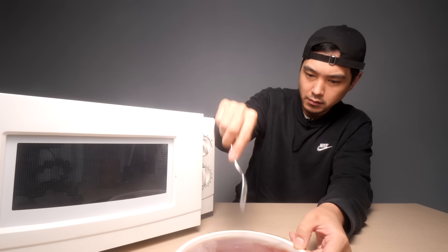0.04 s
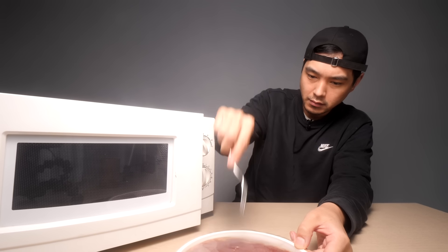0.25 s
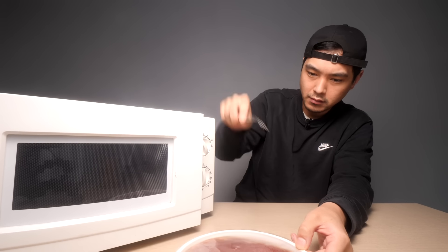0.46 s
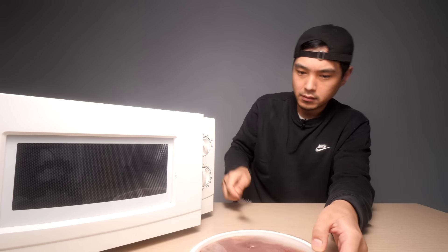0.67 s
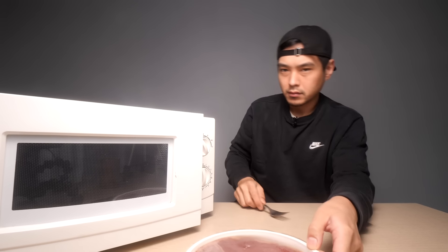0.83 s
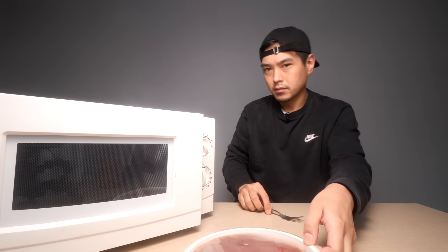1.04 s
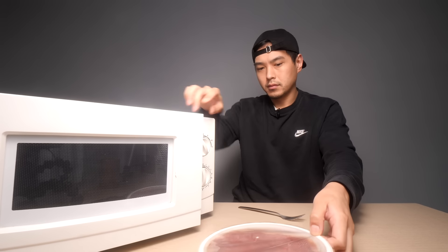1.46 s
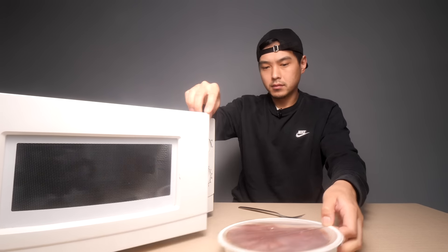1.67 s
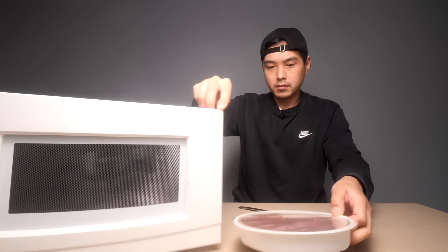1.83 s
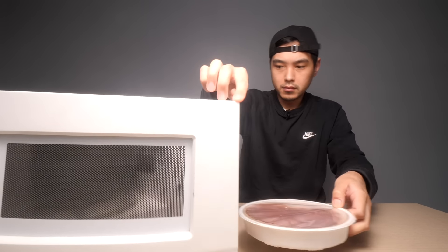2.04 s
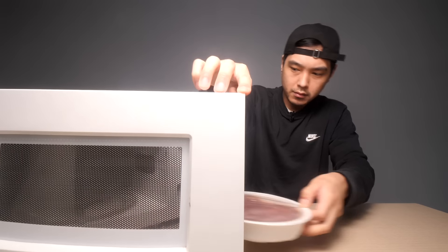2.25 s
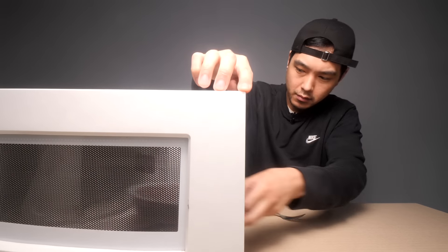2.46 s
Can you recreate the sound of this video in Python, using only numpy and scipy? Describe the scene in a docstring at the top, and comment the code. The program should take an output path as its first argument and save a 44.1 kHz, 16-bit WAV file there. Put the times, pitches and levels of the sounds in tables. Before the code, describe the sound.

A loud pop sounds as a fork pierces a food tray's taut plastic film. The fork then clatters onto a table, followed by faint sliding and a light knock on a microwave door, nearby in a small, faintly humming room.

```python
"""Soft knocks sound as a fork leaves a plastic food tray, over the fading wash of an earlier stab.
The fork stabs through the taut film lid: dull thumps, a loud pop and a long bright tail. Set down
tines first, it drops on the table, bounces and rings in its steel modes. The tray slides with soft
friction and an oven door is nudged, in a small quiet room with a faint mains buzz."""
import sys
import numpy as np
from scipy import signal
from scipy.fft import rfft, irfft
from scipy.io import wavfile

SR = 44100
rng = np.random.default_rng(int(sys.argv[2]) if len(sys.argv) > 2 else 0)


def wav_record(signal):
    """Record a signal, one row per channel, as 16-bit PCM in the file named by sys.argv[1]."""
    frames = np.transpose(np.atleast_2d(signal))
    bounded = np.clip(frames, -1, 1)
    # unit amplitude maps onto the largest positive 16-bit level
    quanta = np.round(bounded * 32767).astype(np.int16)
    wavfile.write(sys.argv[1], SR, quanta)


N = 114660
TIME = np.arange(N) / SR

# Bright spectrum of friction and light ticks. Each row: frequency in Hz, level in dB.
HISS_SPECTRUM = [(1500, -9), (4000, 1.5), (8000, 1), (12500, 0.5), (16000, 1)]


def from_db(db):
    """Amplitude grows tenfold for every 20 dB."""
    return 10 ** (np.asarray(db) / 20)


def rms_one(x):
    """Normalisation to unit mean power."""
    return x / np.sqrt(np.mean(x ** 2) + 1e-20)


def at_hz(points, hz, column=1):
    """Interpolation of a table column over log frequency."""
    points = np.array(points)
    return np.interp(np.log(hz + 1e-9), np.log(points[:, 0]), points[:, column])


def convolve(x, response):
    """A linear system convolves its input with its impulse response."""
    return signal.fftconvolve(x, response)[:N]


def colour(x, spectrum, size=4096):
    """Minimum-phase filtering: folding the cepstrum makes the response causal."""
    hz = np.arange(size // 2 + 1) * SR / size
    cepstrum = irfft(np.log(from_db(at_hz(spectrum, hz))))
    cepstrum[1:size // 2] *= 2
    cepstrum[size // 2 + 1:] = 0
    return convolve(x, irfft(np.exp(rfft(cepstrum))))


def noise(spectrum):
    """Filtering colours white noise; the result has unit power."""
    return rms_one(colour(rng.standard_normal(N), spectrum))


def decay(t60, start_s=0):
    """Exponential damping: from the start, 60 dB is lost every t60 seconds."""
    return np.exp(-np.log(1000) * np.maximum(TIME - start_s, 0) / t60)


def impulses(starts, db):
    """A brief contact is idealised as an impulse."""
    out = np.zeros(N)
    np.add.at(out, np.clip(np.asarray(starts) * SR, 0, N - 1).astype(int), from_db(db))
    return out


def blows(starts, db, spectrum, t60, scatter_db):
    """A damped body filters impacts. Returns direct sound with crackle, and bare pulses for the room."""
    mean_power = np.mean(from_db(at_hz(spectrum, np.linspace(0, SR / 2, N))) ** 2)
    pulses = np.sqrt(SR / 1000 / mean_power) * impulses(starts, db)  # dB is rms over a millisecond
    fade, scatter = decay(t60) ** 2, from_db(scatter_db)
    energy = np.abs(convolve(pulses ** 2, fade / fade.sum()))
    crackle = rng.standard_normal(N) * np.sqrt(energy)
    force = (pulses + scatter * crackle) / np.hypot(1, scatter)
    return np.array([colour(force, spectrum), colour(pulses, spectrum)])


def reverb(x, bands, first_echo_s=.0075):
    """A diffuse field acts as noise, each half-octave band decaying at its own rate."""
    edges = 44 * 2 ** (np.arange(18) / 2)
    white, response = rng.standard_normal((2, N)), 0
    for k, (low, high) in enumerate(zip(edges, edges[1:])):
        hz = np.sqrt(low * high)
        band = signal.sosfilt(signal.butter(2, [low, high], "band", fs=SR, output="sos"), white[k % 2])
        band = rms_one(band * decay(at_hz(bands, hz, column=2)) * (TIME > first_echo_s))
        response = response + band * from_db(at_hz(bands, hz)) * np.sqrt(2 * (high - low) / SR / N)
    return convolve(x, response)


def resonate(x, hz, t60):
    """A damped oscillator answers an impulse with a decaying sine."""
    r, w = np.exp(-np.log(1000) / (t60 * SR)), 2 * np.pi * hz / SR
    return signal.lfilter([0, np.sin(w)], [1, -2 * r * np.cos(w), r * r], x + 1e-18)


def room(x):
    """Reflections merge into a short diffuse tail, and one low room mode booms."""
    # Each row: frequency in Hz, level in dB, decay time in seconds.
    bands = [(60, -4, 0.397), (145.9, 3, 0.55), (500, -1, 0.36), (1214, 0.5, 0.62), (3000, -0.5, 0.49),
             (7040, -4, 0.4), (14000, -4, 0.36)]
    return reverb(x, bands) + from_db(-53) * resonate(x, hz=150.2, t60=.99)


def room_air():
    """The noise floor is steady and strongest in the bass."""
    # Each row: frequency in Hz, relative level in dB.
    spectrum = [(20, 1), (50, -2), (120, -8.5), (300, -16), (800, -20.5), (1800, -32), (5000, -36.5),
                (15000, -41.5)]
    return from_db(-56) * noise(spectrum)


def mains(hz=59.95, gap_s=.0081):
    """Periodicity gives harmonics: a low hum, and a buzz of one strong and one weak spike a cycle."""
    # Each row: multiple of the mains frequency, level in dB.
    harmonics = [(1, -57), (2, -56), (4, -62.5)]
    # Each row: frequency in Hz, relative level in dB.
    buzz_spectrum = [(60, -21), (230, -8.5), (320, -5.5), (500, 5.5), (750, -5), (950, -1.5), (1500, -12.5),
                     (3000, -18.5), (8000, -27.5), (15000, -36.5)]
    hum = sum(from_db(db) * np.sqrt(2) * np.sin(2 * np.pi * (round(k) * hz * TIME + rng.random()))
              for k, db in harmonics)
    cycles = np.arange(0, N / SR - gap_s, 1 / hz)
    spikes = impulses(cycles, db=0) - impulses(cycles + gap_s, db=-7)
    return hum + from_db(-62.5) * rms_one(colour(spikes, buzz_spectrum))


def light_knocks(events, body, t60, scatter_db, room_db):
    """Each light impact excites a damped body and adds a faint contact tick."""
    starts, knock_db, tick_db = np.transpose(events)
    knocks = blows(starts, knock_db, body, t60, scatter_db)
    direct, sent = knocks + blows(starts, tick_db, HISS_SPECTRUM, t60=.016, scatter_db=18)
    return direct + from_db(room_db) * room(sent)


def tray_knocks():
    """The fork knocks the tray as it leaves; heavy damping keeps the plastic's sound short."""
    # Each row: start in seconds, knock level in dB, tick level in dB.
    knocks = [(.001, -24.5, -49.5), (.004, -23.5, -45.5), (.011, -26.5, -40), (.033, -28, -54.5)]
    # Each row: frequency in Hz, level in dB.
    plastic_spectrum = [(60, -12.5), (140, 3), (260, 0.5), (380, -5), (520, 1.5), (850, -6.5),
                        (1500, -15.5), (3000, -24), (12000, -41)]
    return light_knocks(knocks, plastic_spectrum, t60=.019, scatter_db=13.5, room_db=0)


def waver(depth=.47, rate_hz=25.4):
    """Slow random flutter of a ringing tone's amplitude and phase, as room reflections make it shimmer."""
    hop = 32  # samples per step
    r, size = np.exp(-2 * np.pi * rate_hz * hop / SR), N // hop + 200
    white = rng.standard_normal(size) + 1j * rng.standard_normal(size)
    slow = signal.lfilter([1], [1, -2 * r, r * r], white)
    slow = np.interp(np.arange(N) / hop + 190, np.arange(size), slow / slow.std())
    return (1 + depth * slow) / np.hypot(1, depth)


def ring(starts, db, modes, spread_db=1.5):
    """Each contact adds energy to every mode; it drains exponentially while the tone wavers."""
    out = 0
    for hz, level_db, t60 in modes:
        strikes = impulses(starts, db + level_db + rng.normal(0, spread_db, len(starts)))
        retained = np.exp(-2 * np.log(1000) / (t60 * SR))
        energy = signal.lfilter([1], [1, -retained], strikes ** 2 + 1e-22)
        tone = np.real(waver() * np.exp(2j * np.pi * (hz * TIME + rng.random())))
        out = out + np.sqrt(energy) * tone
    return out


def stab(earlier_lead_s=.49, earlier_db=-3.5):
    """The tray thumps as the film yields; rupture releases the tension in a pop that rings the tray."""
    # The tines push the film in, then it bursts. Each row: start in seconds, level in dB.
    pushes = [(0.2148, -36), (0.2191, -17), (0.2214, -23.5), (0.2241, -12), (0.2271, -1.5)]
    pops = [(0.2329, 1)]
    # Each row: frequency in Hz, level in dB.
    tray_spectrum = [(40, -11.5), (90, 2.5), (160, 1), (250, 0.5), (340, -5.5), (500, 2.5), (750, -7),
                     (1200, -9.5), (1800, -16), (3500, -19.5), (7000, -29), (15000, -36)]
    film_spectrum = [(60, -18), (200, -7.5), (600, 2), (1150, 3.5), (1800, -29), (2600, -0.5), (4000, -7.5),
                     (7000, -12), (15000, -22.5)]
    # Each row: frequency in Hz, relative level in dB, decay time in seconds.
    tray_modes = [(111.5, -27.5, .12), (237, -26, 0.14), (476.6, -20.5, 0.086), (626.2, -22.5, .08),
                  (1133, -19, .05), (1281, -22, 0.044)]
    wash_bands = [(60, -20.5, .5), (150, -17, .7), (320.6, -11.5, 0.96), (550, -9, 0.56),
                  (1104, -12.5, 0.37), (1730, 2.5, 0.88), (2500, -10, 0.64), (4244, -6, .75),
                  (7960, -8, .66), (13980, -12.5, 0.469)]
    thumps = blows(*np.transpose(pushes), tray_spectrum, t60=.016, scatter_db=-1)
    pop = blows(*np.transpose(pops), film_spectrum, t60=.013, scatter_db=11)
    direct, sent = thumps + pop
    wash, lead = reverb(sent, wash_bands), int(earlier_lead_s * SR)
    earlier_wash = from_db(earlier_db) * np.pad(wash[lead:], (0, lead))  # the stab before dies away
    ringing = ring(*np.transpose(pops), tray_modes)
    return direct + ringing + wash + from_db(-21) * room(sent) + earlier_wash


def slides(fade_s=.03):
    """Sliding friction of sleeve and tray makes broadband noise: a high hiss over a dull rub."""
    # Each row: start in seconds, length in seconds, hiss level in dB, rub level in dB.
    strokes = [(0.602, 0.15, -63.5, -50), (0.818, 0.078, -70, -65), (1.08, 0.067, -60, -62),
               (1.52, 0.27, -67.5, -59), (2.09, 0.3, -66.5, -73)]
    # Each row: frequency in Hz, level in dB.
    rub_spectrum = [(60, -3), (200, -2), (550, 0.5), (1200, -15), (3000, -17.5), (10000, -40)]
    hiss, rub, out = noise(HISS_SPECTRUM), noise(rub_spectrum), 0
    for start, length, hiss_db, rub_db in strokes:
        envelope = np.clip(np.minimum(TIME - start, start + length - TIME) / fade_s, 0, 1)
        out = out + envelope * (from_db(hiss_db) * hiss + from_db(rub_db) * rub)
    return out


def fork_drop():
    """Each impact knocks the table and excites the fork's modes, which ring until they are damped."""
    # Each row: start in seconds, then levels in dB of knock, thud, tick, tines, handle and neck.
    contacts = [(1.0013, -25, -51.5, -34, -43.5, -80.5, -75), (1.0092, -28.5, -49, -56, -65, -82.5, -75),
                (1.0512, -22, -43.5, -38, -38, -79, -66), (1.057, -52.5, -60.5, -39, -55, -78.5, -81),
                (1.1043, -43.5, -56, -37.5, -66, -77, -70), (1.119, -37, -59, -41.5, -67.5, -75, -74),
                (1.13, -40.5, -62.5, -50.5, -70, -69.5, -76),
                (1.1954, -10, -19.5, -10.5, -32.5, -30.5, -42.5), (1.205, -22, -28, -27, -39.5, -56, -59),
                (1.213, -15.5, -26, -36, -48, -59, -56), (1.2241, -16, -34, -16.5, -40, -33.5, -45),
                (1.242, -13.5, -40, -25.5, -34.5, -57, -58), (1.2473, -44, -40, -19.5, -53, -55, -44.5),
                (1.254, -19, -33, -26, -32.5, -58, -45), (1.269, -29, -42, -24.5, -45, -42.5, -36.5)]
    # Each row: frequency in Hz, level in dB.
    table_spectrum = [(60, -50.5), (200, -8), (400, -1), (520, 4), (630, -3.5), (760, 0), (950, -5),
                      (1200, 0), (1800, -10.5), (3000, -14.5), (8000, -32), (15000, -46.5)]
    thud_spectrum = [(50, -26), (110, -3), (160, 8.5), (260, -3), (500, -19), (2000, -55)]
    tick_spectrum = [(500, -13.5), (1800, -5), (2500, 0), (3300, -1), (3900, -5), (4600, 1), (5400, -3),
                     (6400, 1), (7600, -11), (11000, -12), (13300, -7.5), (14400, -12.5), (16000, -6.5)]
    # Each row: frequency in Hz, relative level in dB, decay time in seconds.
    tine_modes = [(381, 3.5, 0.16), (1013, -3.5, 0.52), (1075, 6, 0.25), (1129, 0, 0.24),
                  (1183, -1.5, 0.28), (11800, -23, 0.25), (12860, -32, .15), (13800, -14, 0.14)]
    handle_modes = [(2475, -7.5, 0.15), (2773, -5.5, 0.22), (5600, -22, 0.65), (5740, -11.5, 0.68),
                    (5970, -24, 1.7), (8030, -4, 0.36), (9564, -2, 0.32), (11350, -17.5, .18),
                    (12369, 2, 0.23), (15624, -9, .23)]
    neck_modes = [(2288, 2.5, 0.11), (4260, 4.5, .2), (9030, 0.5, .19), (14800, -9.5, 0.19)]
    starts, knock_db, thud_db, tick_db, tine_db, handle_db, neck_db = np.transpose(contacts)
    knocks = blows(starts, knock_db, table_spectrum, t60=.022, scatter_db=5.5)
    thuds = blows(starts, thud_db, thud_spectrum, t60=.022, scatter_db=-3.5)
    ticks = blows(starts, tick_db, tick_spectrum, t60=.027, scatter_db=5.5)
    direct, sent = knocks + thuds + ticks
    steel = ring(starts, tine_db, tine_modes) + ring(starts, handle_db, handle_modes)
    steel += ring(starts, neck_db, neck_modes)
    return direct + steel * decay(t60=.12, start_s=1.664) + from_db(-.5) * room(sent)


def oven_door():
    """Nudges excite the door, whose damped response peaks in the midrange."""
    # Each row: start in seconds, knock level in dB, tick level in dB.
    nudges = [(1.662, -41, -64), (1.671, -43, -71), (1.676, -28.5, -45.5), (1.698, -30.5, -73.5)]
    # Each row: frequency in Hz, level in dB.
    door_spectrum = [(60, -19), (140, -8), (300, -10.5), (550, -8), (780, 3), (1050, -3), (1600, -13),
                     (3500, -25), (7000, -43), (14000, -51)]
    return light_knocks(nudges, door_spectrum, t60=.059, scatter_db=11, room_db=-9)


def scene():
    """Superposition: the pressures of all sources add at one microphone."""
    knocks = tray_knocks() + oven_door()
    return (knocks + stab() + fork_drop() + slides() + mains() + room_air())[None]


def record(dry, clip_level=.94, cutoff_hz=15720):
    """The pop overloads into brief clipping; a steep low-pass limits the bandwidth."""
    low_pass = signal.ellip(12, .1, 80, cutoff_hz, fs=SR, output="sos")
    return signal.sosfilt(low_pass, np.clip(dry, -clip_level, clip_level))


dry = scene()
out = record(dry)
wav_record(out)
```